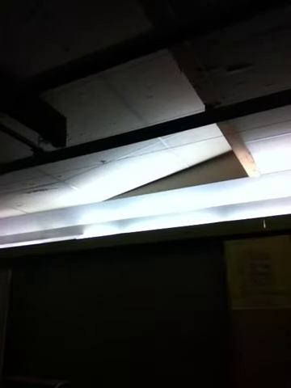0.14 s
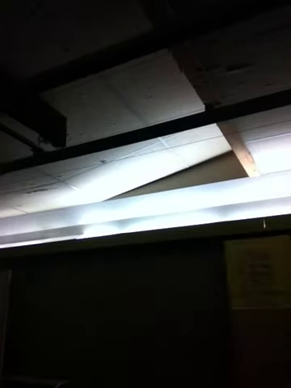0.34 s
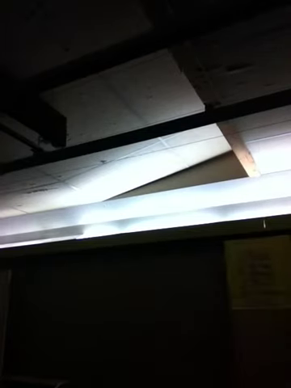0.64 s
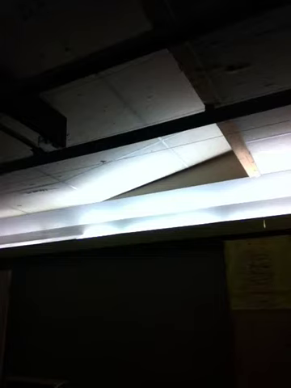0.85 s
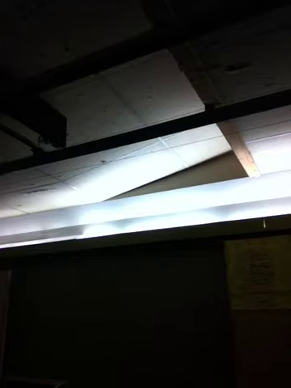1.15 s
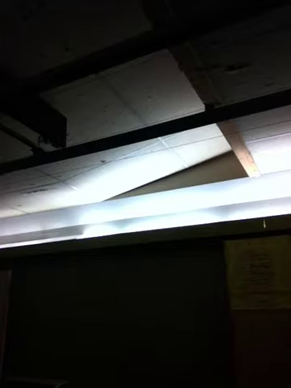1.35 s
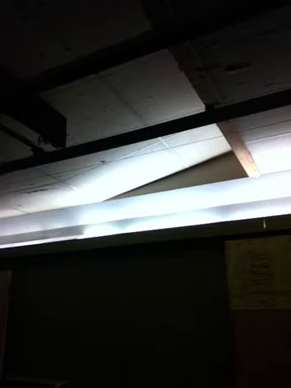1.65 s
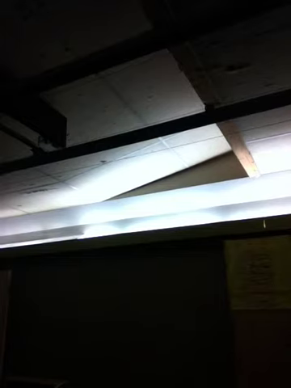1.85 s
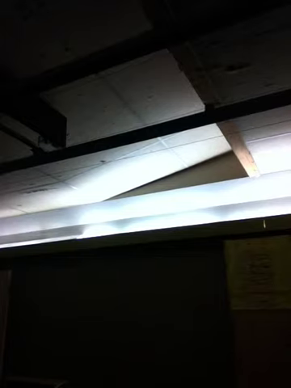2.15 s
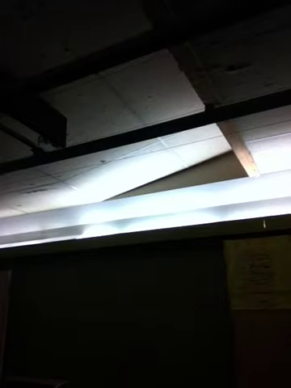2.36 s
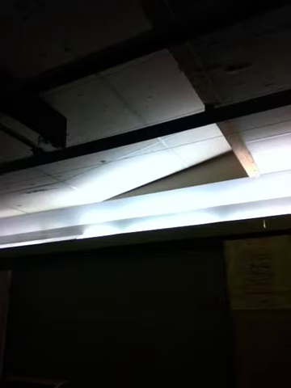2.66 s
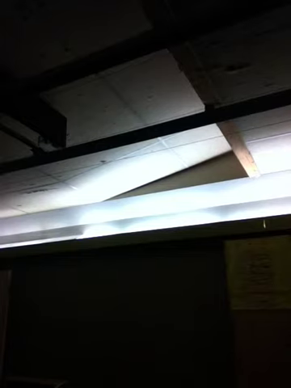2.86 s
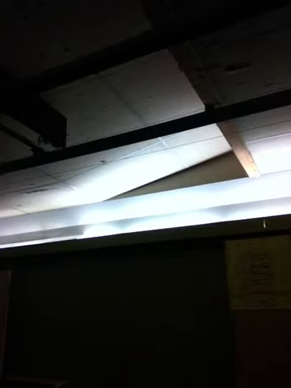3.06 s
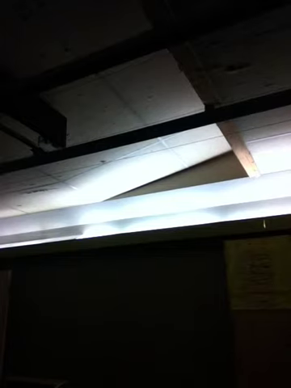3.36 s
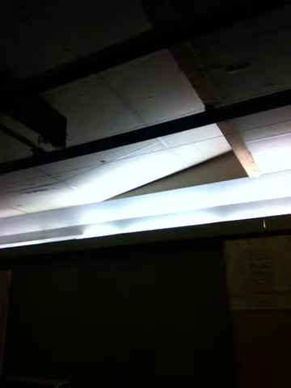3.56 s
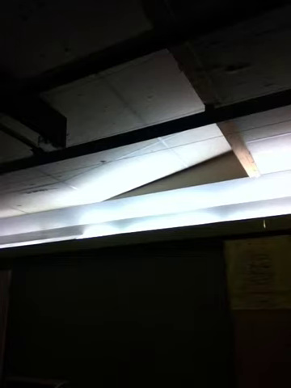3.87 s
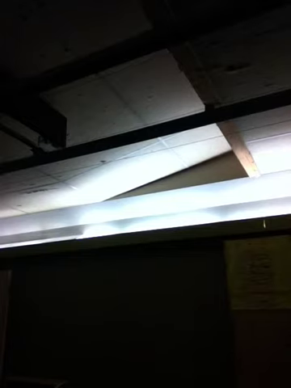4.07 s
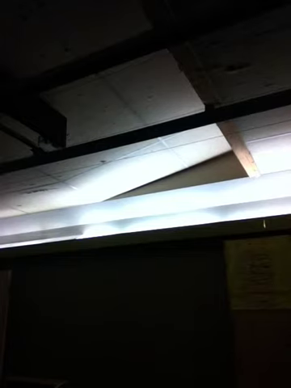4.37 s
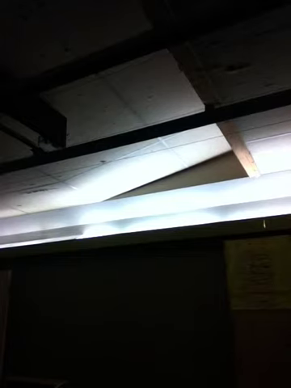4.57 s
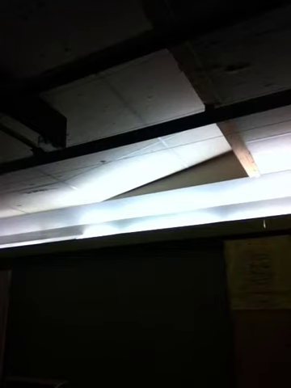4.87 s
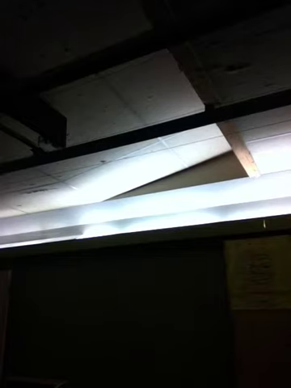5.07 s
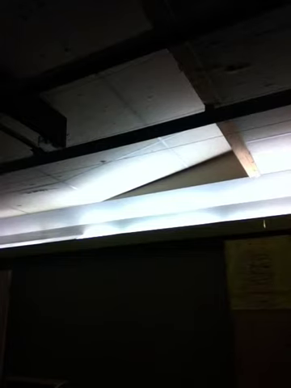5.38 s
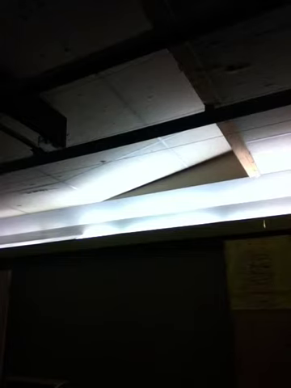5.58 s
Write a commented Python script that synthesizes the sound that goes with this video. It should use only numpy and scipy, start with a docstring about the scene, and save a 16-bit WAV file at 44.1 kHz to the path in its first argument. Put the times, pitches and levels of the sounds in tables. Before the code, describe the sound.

Close handling of small metal cartridges on a hard bench: a few light clinks first, then a busy run of bright ticks, dull rubbing and soft thuds, with two hard snaps in the middle. It thins out, nearly stops, and briefly resumes at the end. Quiet indoor space, short reflections, faint ventilation rumble and small-microphone hiss.

```python
"""Ventilation rumbles under the hiss of a small microphone, and at once brass cases clink and knock.
Loose cartridges are fingered, dropped and pushed into a revolver on the bench of a quiet indoor range.
Clinks, knocks of steel and wood, and thuds are impact-excited decaying modes; two knocks are hard snaps.
Handling is a dense train of random contacts; near partitions scatter it all back as decaying noise."""
import sys
import numpy as np
from scipy import signal
from scipy.fft import rfft, irfft, next_fast_len
from scipy.io import wavfile

SR = 44100
rng = np.random.default_rng(int(sys.argv[2]) if len(sys.argv) > 2 else 0)


def pcm_store(signal):
    """Save signal as 16-bit PCM."""
    levels = np.round(np.clip(np.atleast_2d(signal), -1, 1) * 32767)
    wavfile.write(sys.argv[1], SR, levels.astype(np.int16).T)


N = 252252
AFTER_BLOW = np.arange(SR // 8) / SR    # seconds since contact


def from_db(db):
    """Logarithmic level: decibels to amplitude gain."""
    return 10 ** (np.asarray(db) / 20)


def rms_one(x):
    """Normalisation of power: scale to unit rms."""
    return x / np.sqrt(np.mean(x ** 2) + 1e-20)


def coloured(x, spectrum):
    """Spectral shaping: weight x by a (frequency [Hz], level [dB]) table, then set its rms to 1."""
    size = next_fast_len(N)
    hz = np.maximum(np.arange(size // 2 + 1) * SR / size, 1)
    points = np.array(spectrum)
    level_db = np.interp(np.log(hz), np.log(points[:, 0]), points[:, 1])
    return rms_one(irfft(rfft(x, size) * from_db(level_db), size)[:N])


def band(x, low_hz, high_hz):
    """Band limiting: causal band-pass along the last axis."""
    return signal.sosfilt(signal.butter(2, [low_hz, high_hz], "band", fs=SR, output="sos"), x)


def placed(times, sounds):
    """Superposition: add each row of sounds at its own time."""
    out = np.zeros(N + sounds.shape[1])
    for s, sound in zip(times, sounds):
        out[round(s * SR):][:len(sound)] += sound
    return out[:N]


def struck(hz, modes, count, rise_s, spread_db, lasting=1, scatter=1):
    """Modal excitation: each blow gives every decaying mode a new strength and phase; contact takes rise_s."""
    t = AFTER_BLOW
    chance = rng.random((count, 2 * len(modes)))
    out = 0
    for k, (factor, level_db, t60) in enumerate(modes):
        strength = from_db(level_db + spread_db * (2 * chance[:, [2 * k]] - 0.5))
        fade = from_db(-60 * np.maximum(t - rise_s, 0) / (t60 * lasting))
        phase = scatter * chance[:, [2 * k + 1]]    # in cycles; scatter 0 makes all modes crest together
        cycles = hz * factor * (t - rise_s) + phase
        out = out + strength * fade * np.cos(2 * np.pi * cycles)
    onset = np.sin(np.pi / 2 * np.minimum(t / rise_s, 1)) ** 2
    return out * onset


# spectrum of ventilation rumble and microphone hiss: (frequency [Hz], relative level [dB])
AIR_SPECTRUM = [(15, -54.5), (25, -26), (53, -17), (74, -23), (91, -17.5), (141, -8.5), (189, -3),
                (255, -3.5), (604, -15), (812, -19), (1150, -21), (1590, -26), (1780, -25), (2810, -27.5),
                (15800, -32)]
AIR_DB = -62


def ventilation_and_hiss():
    """Stationary random noise: one coloured noise holds the low rumble and the faint hiss."""
    return from_db(AIR_DB) * coloured(rng.standard_normal(N), AIR_SPECTRUM)


HUM_HZ, HUM_DB = 52.1, -92


def hum():
    """Simple harmonic tone: a very faint, steady low sine."""
    return from_db(HUM_DB) * np.sin(2 * np.pi * HUM_HZ * np.arange(N) / SR)


BOOTH_T60_S, BOOTH_DB = 0.25, -26.5


def booth(x):
    """Diffuse reflection: near partitions scatter sound back as exponentially decaying noise."""
    t = np.arange(SR // 4) / SR
    fade = from_db(-60 * t / BOOTH_T60_S)
    tail = band(rng.standard_normal(len(t)), 400, 6900) * fade * (t > .004)
    tail = tail / np.sqrt(np.sum(tail ** 2))
    return from_db(BOOTH_DB) * signal.fftconvolve(x, tail)[:N]


# spells of busy hands: (start [s], length [s], bright rattle level [dB], dull rubbing level [dB])
HANDLING_SPELLS = [(0.457,.04,-77,-72),(0.531,.05,-80,-77.5),(0.745,.09,-73,-80.5),(1.354,.07,-69.5,-62.5),(1.432,.05,-61.5,-60.5),(1.492,.04,-76,-64),(1.561,.16,-76.5,-65.5),(1.868,.12,-76,-65),(2.059,.11,-79.5,-70),(2.228,.05,-85.5,-68),(2.293,.035,-69.5,-61.5),(2.343,.045,-62.5,-56.5),(2.409,.06,-72,-63),(2.502,.055,-57.5,-58.5),(2.566,.06,-74.5,-68),(2.68,0.11,-86.5,-67.5),(2.802,0.11,-74,-66),(2.929,.055,-65,-60),(3.003,.085,-74.5,-70.5),(3.139,.09,-71,-64.5),(3.258,.12,-64.5,-63.5),(3.451,.04,-76,-69),(3.518,.09,-73,-63),(5.204,.03,-66.5,-63),(5.271,.04,-69.5,-64),(5.328,.04,-81,-64.5),(5.502,.1,-82.5,-74)]
SPELL_RISE_S, SPELL_FALL_S = 0.0088, 0.023    # time constants of the Gaussian flanks


def busy():
    """Envelope and power addition: spells swell, hold and die away; returns rattle and rubbing gains."""
    t = np.arange(0, N / SR + .002, .001)
    start, length, *levels_db = np.array(HANDLING_SPELLS).T[:, :, None]
    before = np.minimum(t - start, 0) / SPELL_RISE_S
    after = np.maximum(t - start - length, 0) / SPELL_FALL_S
    shape = np.exp(-before ** 2 - after ** 2)
    gains = []
    for level_db in levels_db:
        power = np.sum((from_db(level_db) * shape) ** 2, axis=0)
        gains.append(np.interp(np.arange(N) / SR, t, np.sqrt(power + 1e-12)))
    return gains


SMALL_SPREAD_DB = 1.5    # spread of the small touches, either way


def small_touches(gain, count):
    """Inhomogeneous point process: touches thicken with gain; returns time, level [dB], two chances."""
    chance = rng.random((count, 4))
    share = np.cumsum(gain ** .7)
    targets = share[-1] * (np.arange(count) + chance[:, 0]) / count
    at = np.searchsorted(share, targets).clip(0, N - 1)
    level_db = 20 * np.log10(gain[at]) + SMALL_SPREAD_DB * (2 * chance[:, 1] - 1)
    return at / SR, level_db, chance[:, 2], chance[:, 3]


def grains(per_s, spread_db, clump_db):
    """Shot noise: dense random contacts of uneven size that come in clumps."""
    size_db = spread_db * np.minimum(rng.exponential(1, N), 5)
    sizes = from_db(size_db) * rng.choice([-1, 1], N)
    clumps = from_db(clump_db * rms_one(band(rng.standard_normal(N), 24, 120)))
    return sizes * clumps * (rng.random(N) < per_s / SR)


# spectra of bright rattle, dull rubbing and low rumble of handling: (frequency [Hz], relative level [dB])
RATTLE_SPECTRUM = [(2500, -37), (4000, -14), (9500, 1), (10800, -11), (11280, 1.5), (11900, -12),
                   (12750, -0.5), (13400, -10.5), (15500, -16.5)]
RUBBING_SPECTRUM = [(400, -5.5), (800, 1.5), (1500, -3), (2300, -4.5), (3500, -4), (5000, -14.5)]
RUMBLE_SPECTRUM = [(100, -27), (170, -7.5), (300, 0.5), (450, -8), (700, -9.5), (1200, -45)]
RUMBLE_OVER_RUB_DB = 1.5


def handling(rattle, rub):
    """Filtered shot noise: countless small touches between cases, fingers and bench."""
    bright = coloured(grains(per_s=5000.0, spread_db=7.0, clump_db=4.5), RATTLE_SPECTRUM)
    dull = coloured(grains(per_s=2200.0, spread_db=0.0, clump_db=4.5), RUBBING_SPECTRUM)
    low = coloured(grains(per_s=330.0, spread_db=1.5, clump_db=0.5), RUMBLE_SPECTRUM)
    return rattle * bright + rub * dull + from_db(RUMBLE_OVER_RUB_DB) * rub * low


# thuds of the bench top: (time [s], level before trim [dB])
BENCH_THUDS = [(1.377,-47),(1.39,-52),(1.451,-39.5),(1.493,-51),(1.585,-44.5),(1.665,-47),(1.858,-45),(1.961,-48),(2.075,-41.5),(2.315,-47),(2.384,-70),(2.453,-46),(2.486,-44.5),(2.517,-46.5),(2.547,-41.5),(2.676,-32.5),(2.829,-50.5),(3.279,-50),(3.509,-52.5),(3.534,-54),(5.207,-43),(5.273,-40.5),(5.311,-47.5),(5.349,-41.5),(5.55,-50),(5.584,-49.5)]
# lowest modes of the bench top: (frequency [Hz], relative level [dB], t60 [s])
BENCH_TOP_MODES = [(160, -7, .09), (294, -0.5, .08), (360, 0, 0.044), (481, -8.5, 0.094)]


def thuds():
    """Contact-time low-pass: soft contact moves only the low modes of the bench top."""
    s, level_db = np.transpose(BENCH_THUDS)
    modes = struck(1, BENCH_TOP_MODES, count=len(s), rise_s=0.0097, spread_db=1.0)
    return placed(s - .004, from_db(level_db - 5.5)[:, None] * modes)


# knocks of gun and cases on the bench: (time [s], level before trim [dB], pitch [Hz])
BENCH_KNOCKS = [(.028,-42.5,2260),(.4648,-48,2720),(.4682,-54,2570),(.4773,-41,2210),(.576,-51,2730),(.7673,-36.5,2270),(.8047,-47,2330),(.8286,-35,3010),
                (1.3473,-51,2660),(1.3906,-48,2190),(1.4062,-45,1900),(1.4355,-43,2130),(1.4414,-34.5,1700),(1.4445,-33,2380),(1.4486,-34,1420),(1.5685,-46.5,2330),(1.5826,-50,2300),(1.6407,-52,2630),(1.647,-41.5,2050),(1.6614,-48,2200),(1.6652,-37,2020),(1.695,-45,2600),
                (1.8615,-36.5,2640),(1.9,-49,2620),(1.9588,-46.5,2140),(1.9805,-56,2430),(2.0565,-39.5,2550),(2.0615,-18,2324),(2.0642,-28.5,2570),(2.0925,-48,2200),(2.1279,-45,2380),(2.1586,-52,2060),(2.2311,-40.5,1810),
                (2.2672,-49,2180),(2.302,-51,2100),(2.31,-47.5,2250),(2.3473,-43,1670),(2.357,-44,1190),(2.4495,-42,2350),(2.474,-52,1880),(2.511,-42.5,2550),(2.5156,-36,2180),(2.5215,-36,1070),(2.539,-32.5,2320),(2.5435,-35,2540),(2.5485,-38,1780),(2.6189,-56,2500),
                (2.668,-37,2600),(2.6763,-11.5,2324),(2.6947,-35,1810),(2.7044,-44,2050),(2.8095,-44.5,2220),(2.8195,-42.5,1990),(2.87,-47.5,2140),(2.906,-47,2170),(2.9354,-45,1120),(2.9422,-44,1240),(2.993,-59,1600),(3.0582,-54,1430),
                (3.1386,-54,2050),(3.1823,-52.5,1700),(3.3137,-42,1170),(3.3303,-47.5,1160),(3.4488,-57,2000),(3.529,-46,1820),(3.5518,-49.5,2110),(3.5904,-54,2030),
                (4.351,-45,2410),(4.4081,-48,1223),(4.5594,-42.5,1970),(5.2074,-47,2270),(5.2236,-52,1240),(5.269,-48,1680),(5.2822,-51,1980),(5.3031,-50.5,2220),(5.332,-44,1580),(5.3414,-41.5,2330),(5.563,-40.5,2660)]
# the few strong cycles of a knock: (pitch ratio [1], relative level [dB], share of the knock's t60 [1])
BLOW_MODES = [(1.11, -8, .55), (.99, -17, 0.29), (.88, -12.5, 0.82), (0.35, -20, 0.54), (1.65, -16.5, 0.28),
              (2.2, -23, 0.28)]
# bench and frame ringing on after a knock: (frequency [Hz], relative level [dB], t60 [s])
BENCH_AND_FRAME_MODES = [(575, -30, .08), (695, -30, .06), (900, -33, .06), (1070, -29, .07),
                         (1280, -36, .07), (1490, -35, .06), (1660, -33, .06), (1755, -30, .07),
                         (1855, -31, .07), (2085, -30, .07), (2250, -32, .07), (2520, -31, .05),
                         (2970, -37, .035)]
# decay at the reference pitch; lower knocks last longer by this power
KNOCK_T60_S, KNOCK_HZ, LOW_LASTS = 0.027, 2200, 0.59
# softer knocks touch longer
HARD_CONTACT_S, SOFT_CONTACT_S, HARD_DB, SOFT_DB = .0008, 0.0014, -40.5, -55
SMALL_KNOCK_DB = 8    # unlisted knocks, over the level of rubbing, before trim


def knocks(rub):
    """Impact and free vibration: a few strong cycles at the blow, then bench and frame ring on."""
    s, level_db, which, _ = small_touches(rub, count=45)
    small_hz = np.array(BENCH_KNOCKS)[(which * len(BENCH_KNOCKS)).astype(int), 2]
    small = np.transpose([s, level_db + SMALL_KNOCK_DB, small_hz])
    s, level_db, hz = np.vstack([BENCH_KNOCKS, small]).T[:, :, None]
    contact_s = np.interp(level_db, [SOFT_DB, HARD_DB], [SOFT_CONTACT_S, HARD_CONTACT_S])
    t60 = KNOCK_T60_S * (KNOCK_HZ / hz) ** LOW_LASTS
    blow = struck(hz, BLOW_MODES, count=len(s), rise_s=contact_s + 0.00037, spread_db=0.5,
                  lasting=t60, scatter=0.084)
    body = struck(1, BENCH_AND_FRAME_MODES, count=len(s), rise_s=contact_s + .001, spread_db=4.0)
    # loose parts shake: noise with a fast and a slow decay
    noise = band(band(rng.standard_normal(blow.shape), 490, 2900), 650, 3000)
    fade = from_db(-6.5 - 60 * AFTER_BLOW / 0.041) + from_db(-25 - 60 * AFTER_BLOW / 0.11)
    clatter = noise * fade * np.minimum(AFTER_BLOW / (contact_s + 0.00043), 1)
    return placed(s[:, 0] - .0004, from_db(level_db + 2.5) * (blow + body + clatter))


# brass on brass or steel, levels before trim:
# (time [s], ring level [dB], ring pitch [Hz], ring t60 [ms], contact tick level [dB])
BRASS_CLINKS = [(0.0294,-60.5,11300,12,-47.5),(0.424,-69,11300,8,-57),(0.4732,-47.5,11300,18,-42),(0.4784,-26,11300,5,-39),(.4878,-46,11120,12,-64),(.576,-64.5,11200,8,-54),(0.767,-26,11000,5.3,-25.5),(0.7785,-49,10600,8,-48),(.806,-62,10700,11,-48),(.8292,-61,9810,8,-33),
                (1.3459,-38,11220,11,-59),(1.3533,-42,11330,8,-46.5),(1.368,-39,11600,11,-47),(1.3872,-37.5,11160,14,-51),(1.4203,-26,11200,7,-50),(1.4373,-41,11180,11,-45),(1.4602,-33.5,11200,16,-43),(1.4663,-36,11200,15,-59),(1.485,-46,12810,8,-68),(1.4958,-60,10000,12,-50.5),(1.5196,-41,12200,9,-59),
                (1.5688,-50,12200,25,-49),(1.582,-32,11000,7.4,-46),(1.608,-39,11140,11,-48),(1.641,-44,10200,8,-53),(1.6592,-37,11400,21,-43),(1.67,-41,10700,8,-41),(1.698,-41.5,11350,11,-46.5),(1.735,-56,11200,18,-62),
                (1.862,-25,10350,4.2,-33),(1.87,-42,13300,17,-49),(1.903,-44,11350,11,-46),(1.928,-53,10420,8,-56),(1.9692,-49.5,12680,10,-49.5),(2.0375,-51,13000,5,-66),(2.0579,-34.5,11370,12,-42),(2.0605,-44.5,11360,13,-37),(2.1294,-58,11500,8,-46),(2.23,-60,9700,8,-55),
                (2.263,-50.5,13200,8,-43),(2.2938,-35,11410,24,-42.5),(2.309,-39,11300,11,-43),(2.3403,-35,12800,11,-49),(2.3498,-55,12480,9,-38.5),(2.356,-38,12400,18,-44),(2.365,-41,10200,14,-54),(2.3707,-40,12200,8.7,-48),(2.41,-45,11600,14,-56),(2.4195,-38,11200,17,-55),(2.4379,-57,12370,29,-44.5),(2.4482,-36,11200,16,-46.5),
                (2.5008,-34.5,11200,12,-52),(2.5103,-32,11200,8.7,-53),(2.517,-35,13250,15,-40),(2.5281,-30.5,11380,13,-49),(2.5365,-39,12350,15,-38),(2.541,-30.5,11100,7.2,-40),(2.552,-37,11600,16,-42),(2.6683,-40,11440,13,-41.5),(2.676,-57,11500,8,-37),(2.707,-49.5,11400,18,-59),
                (2.8096,-45.5,12600,16,-40.5),(2.8477,-46,11490,8,-54),(2.87,-43.5,11300,14,-52),(2.8958,-37,11600,7,-49),(2.905,-42,12540,12,-52),(2.924,-58,10700,8,-42),(2.939,-35.5,10120,22,-38),(2.9478,-30.5,11700,20,-53),(2.955,-46,12100,12,-41),(2.9668,-42,12800,30,-48),(2.993,-39.5,11300,9,-53),(3.03,-44,11300,8.5,-60),(3.059,-51,12230,9,-65),(3.082,-48.5,11800,12,-72),
                (3.139,-62.5,12800,15,-52.5),(3.1576,-54,11260,9,-65),(3.1683,-59.5,12250,14,-50),(3.183,-48,10900,13,-56),(3.194,-39,12760,26,-48.5),(3.2093,-42,12740,8,-52),(3.2179,-45,11300,8.8,-47.5),(3.277,-49,11200,12,-49),(3.2849,-47,11300,14,-51),(3.2924,-48,12190,11,-57),(3.3118,-49.5,11230,13,-37.5),(3.3196,-43,11240,18,-54),(3.3264,-32.5,12500,25,-45),(3.341,-43,12700,18,-48),(3.35,-45,12200,8,-52),(3.366,-39,11790,10,-64),
                (3.4496,-41,11440,11,-47),(3.4613,-59,11510,9,-50),(3.5195,-56,11300,8,-56.5),(3.549,-52,11200,9,-52.5),(3.5883,-55.5,11300,28,-51),(3.6118,-50,12730,7,-50),
                (4.3515,-54,11320,12,-48),(4.3975,-56.5,11180,13,-47),(4.4068,-51,10350,5,-44),(4.5599,-40,12940,4,-37.5),
                (5.201,-35.5,11360,25,-52),(5.2062,-33,11400,12,-52),(5.2125,-38.5,10870,11,-54),(5.2254,-46,11250,7.4,-60),(5.2492,-42.5,11470,11,-65),(5.279,-39,12500,15,-45),(5.3152,-48,12830,8,-55),(5.3945,-52.5,11600,8.9,-67),(5.5632,-58,10600,8,-40),(5.5872,-44.5,11400,6.1,-62)]
# modes of a case: (pitch ratio [1], relative level [dB], share of the ring's t60 [1])
CASE_MODES = [(1, 0, 1.35), (1.009, -10, 3.8), (.975, -12, 1.5), (.9, -16, 1.1), (1.135, -13, 1.3),
              (1.24, -18, .6)]
# unlisted clinks: levels over that of rattle, before trim
SMALL_RING_DB, SMALL_TICK_DB, SMALL_RING_MS = 15.5, 3, 12
# the tick is duller where it drowns the ring, fully so by this much
TICK_HZ, DULL_TICK_HZ, DULLING_DB = 7340, 4700, 11.5


def clinks(rattle):
    """Modal ringing: a case rings high, short and unevenly as it wobbles; the contact itself is a tick."""
    s, level_db, which, hardness = small_touches(rattle, count=60)
    small_hz = np.array(BRASS_CLINKS)[(which * len(BRASS_CLINKS)).astype(int), 2]
    small_tick_db = level_db + SMALL_TICK_DB + SMALL_SPREAD_DB * (2 * hardness - 1)
    small = np.transpose([s, level_db + SMALL_RING_DB, small_hz,
                          np.full(len(s), SMALL_RING_MS), small_tick_db])
    s, ring_db, hz, t60_ms, tick_db = np.vstack([BRASS_CLINKS, small]).T[:, :, None]
    t = AFTER_BLOW
    wobble, narrow, broad = rng.standard_normal((len(s), 3, len(t))).swapaxes(0, 1)

    rings = struck(hz, CASE_MODES, count=len(s), rise_s=.001, spread_db=3.0, lasting=t60_ms / 1000)
    rings = rings * (1 + 1.6 * band(wobble, 120, 700))

    dull = np.clip((tick_db - ring_db) / DULLING_DB, 0, 1)
    tick_hz = TICK_HZ + (DULL_TICK_HZ - TICK_HZ) * dull
    # noise on a carrier gathers around the tick's pitch
    pitched = band(narrow, 36, 1400) * np.sin(2 * np.pi * tick_hz * t)
    spread = dull * band(broad, 2300, 11000) + 1.2 * (1 - dull) * band(broad, 5140, 13750)
    fade = from_db(-60 * t / 0.017) + from_db(-18.5 - 60 * t / .05)    # snap, then the steel dies away
    ticks = (1.42 * pitched + 0.48 * spread) * fade
    return placed(s[:, 0] - .0004, from_db(ring_db - 3.5) * rings + from_db(tick_db + 4.5) * ticks)


def scene():
    """Linear superposition: everything on the bench, its scatter, the air and a faint hum."""
    rattle, rub = busy()
    bench = clinks(rattle) + knocks(rub) + thuds() + handling(rattle, rub)
    air = ventilation_and_hiss()
    return (bench + booth(bench) + air + hum())[None]


STOP_EDGE_HZ = 16500    # 45 dB down from here up


def record(dry):
    """Band limiting: a steep low-pass cuts the top."""
    return signal.sosfilt(signal.cheby2(14, 45, STOP_EDGE_HZ, fs=SR, output="sos"), dry)


dry = scene()
out = record(dry)
pcm_store(out)
```